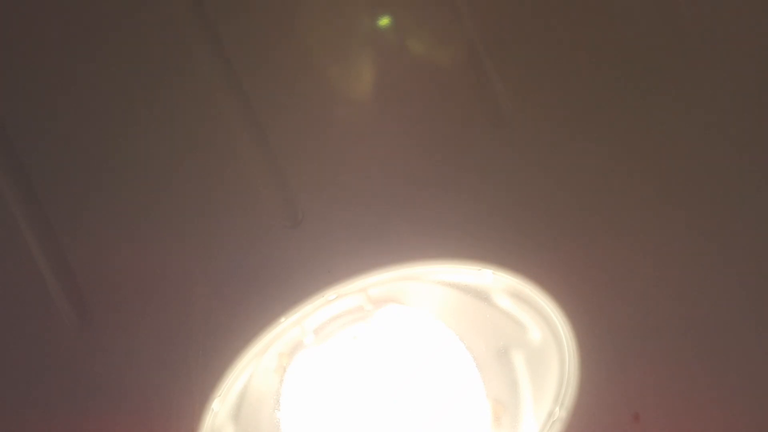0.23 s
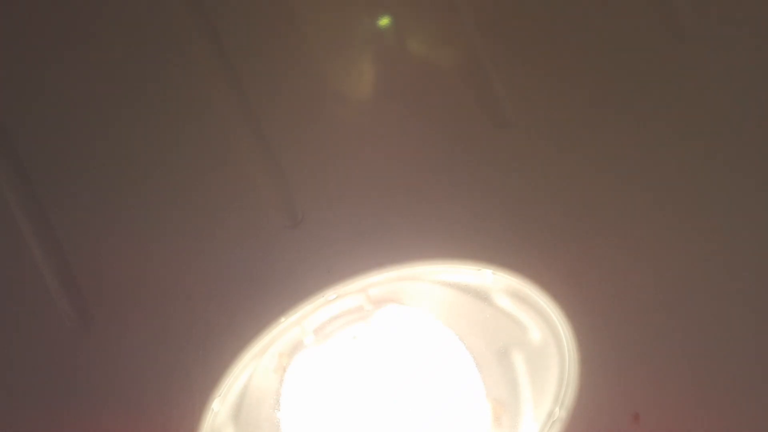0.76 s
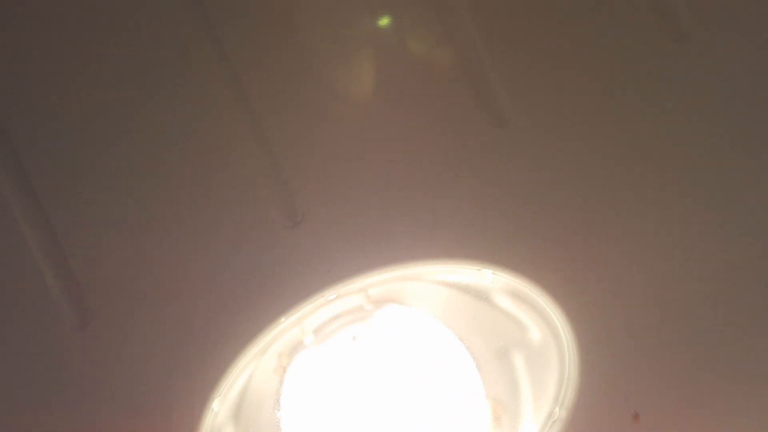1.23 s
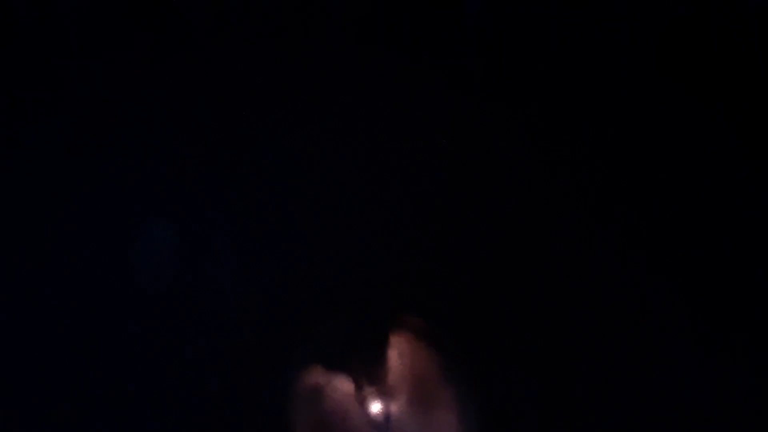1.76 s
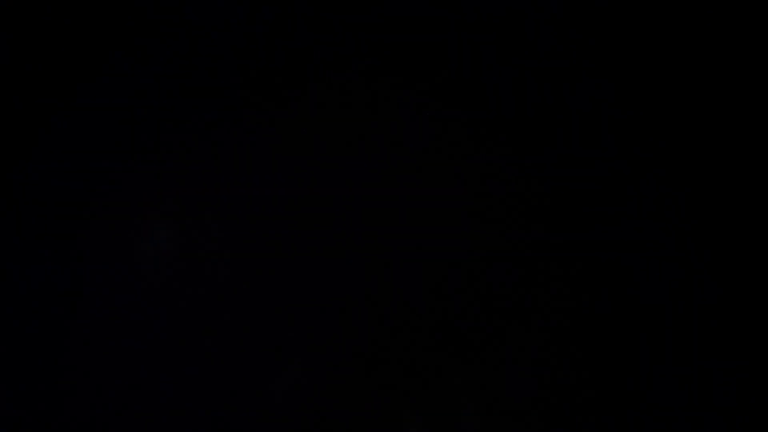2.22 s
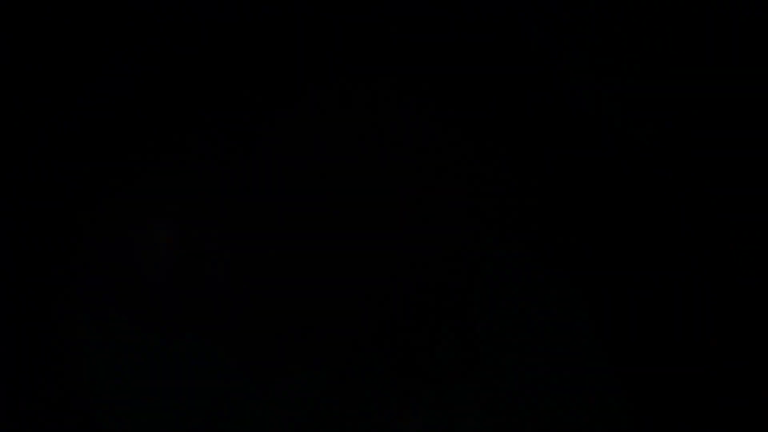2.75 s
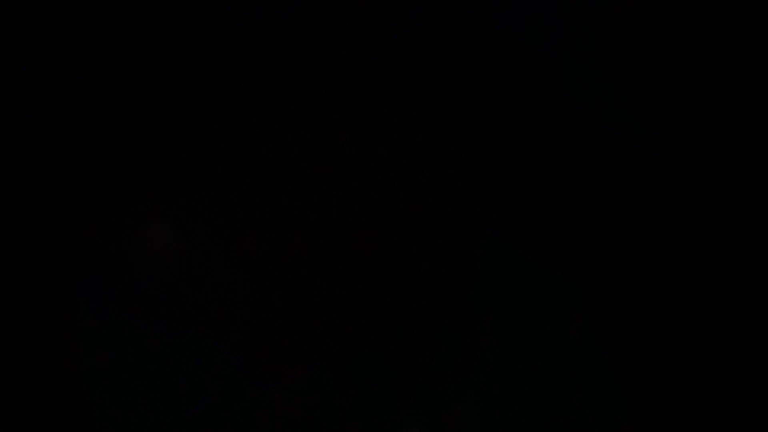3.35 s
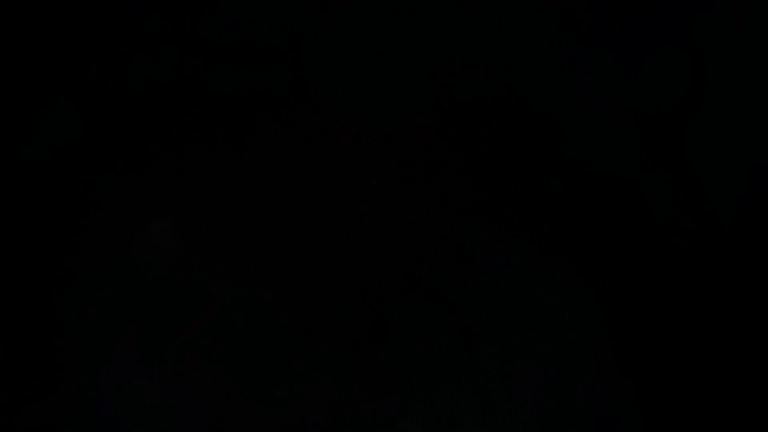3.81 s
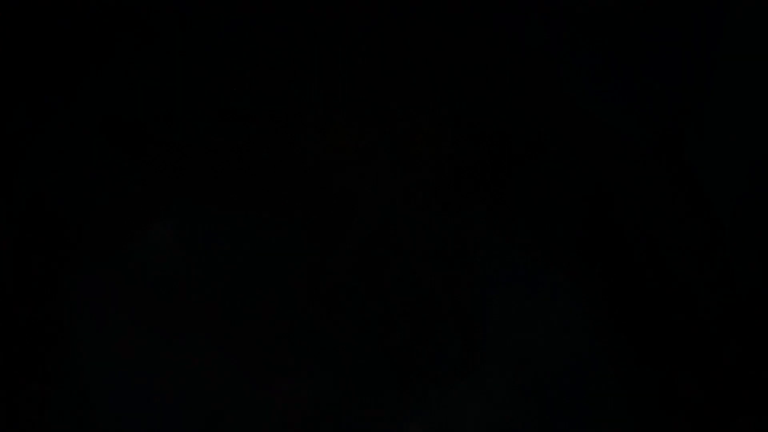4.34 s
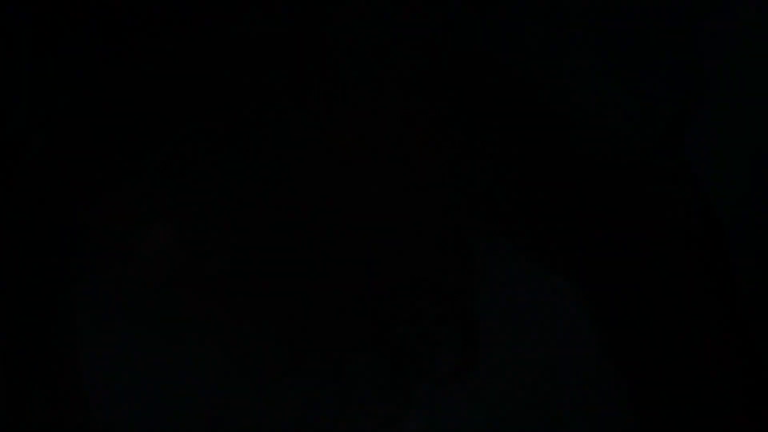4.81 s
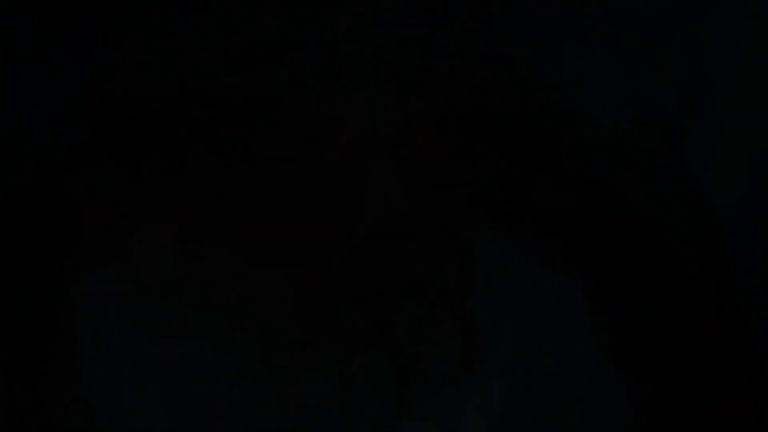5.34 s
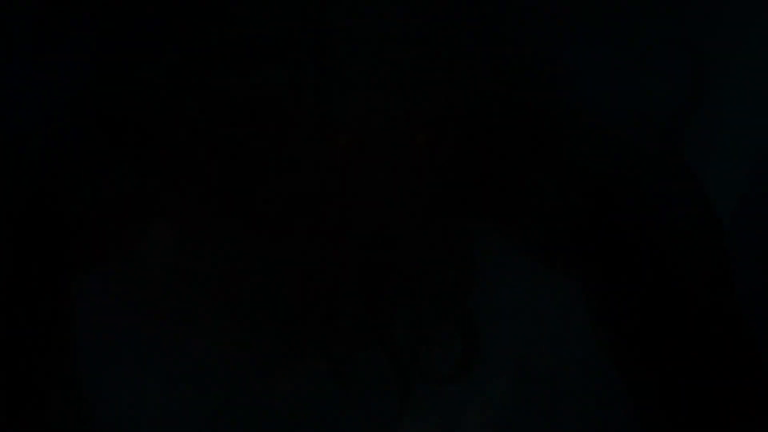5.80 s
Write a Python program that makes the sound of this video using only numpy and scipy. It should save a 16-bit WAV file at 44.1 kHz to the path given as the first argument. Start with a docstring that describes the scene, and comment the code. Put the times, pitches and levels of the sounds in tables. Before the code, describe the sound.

Heard from a shelf inside a refrigerator, the compressor drones low under a faint hiss. The door seal rubs with a few small ticks, then the door lands with a loud thud, its racks clattering and the cabinet ringing briefly. The hiss cuts off and the hum deepens. A circulation fan gradually speeds up to a soft whir, and plastic fittings snap lightly twice.

```python
"""A refrigerator door swings shut, heard from inside: its seal rubs, it lands with a thud,
its racks clatter and the cabinet rings on. Behind it the compressor drones, stirring the air
in the cabinet at its natural pitches (resonances), deeper once the door is shut.
The circulation fan then speeds up, and the plastic fittings tick and snap a few times."""
import sys
import numpy as np
from scipy import signal
from scipy.fft import rfft, irfft, next_fast_len
from scipy.io import wavfile

SR = 44100
rng = np.random.default_rng(int(sys.argv[2]) if len(sys.argv) > 2 else 0)


def unload_audio(sound):
    """Save the sound as a 16-bit wav file, at the path given as the first command line argument."""
    columns = np.transpose(np.atleast_2d(sound))
    # keep every value between -1 and 1, then stretch to whole-number steps
    steps = np.round(np.clip(columns, -1, 1) * 32767)
    wavfile.write(sys.argv[1], SR, steps.astype(np.int16))


N = 268348
T = np.arange(N) / SR
THUD_S = 1.365   # when the door lands
SHORT = SR // 3   # samples in a short burst
SIDES = np.array([[1], [-1]])   # left, right: "mid" is what the ears share, "side" is how they differ


def from_db(db):
    """Turn decibels into a gain."""
    return 10 ** (np.asarray(db) / 20)


def rms_one(x):
    """Scale a sound so that its average strength (rms) is 1."""
    return x / np.sqrt(np.mean(x ** 2) + 1e-20)


def in_time(rows):
    """Join a table's points with straight lines: one curve for each column after the time."""
    times, *columns = np.transpose(rows)
    return [np.interp(T, times, column) for column in columns]


def at_hz(table, hz, column=1):
    """Read one column of a table at any frequency, moving evenly through the octaves."""
    table = np.array(table)
    return np.interp(np.log(hz + 1e-6), np.log(table[:, 0]), table[:, column])


def add(out, start, sound):
    """Mix a short sound in at a given time."""
    i = int(start * SR)
    out[:, i:i + sound.shape[1]] += sound[:, :N - i]


def hump_db(hz, centre_hz, octaves):
    """One peak in the spectrum, falling steeply on both sides."""
    return -24 * np.log10(1 + (np.log2((hz + 1) / centre_hz) / octaves) ** 2)


def box_db(hz):
    """Sound bouncing between the walls and shelves lifts some frequencies."""
    # standing waves of the cabinet: f/Hz, width/Hz, lift/dB
    waves = [(119, 42, 7), (197.4, 20, 9.5), (249.5, 5, 7), (324, 19, 5), (359.8, 4.3, 8), (445, 26, 6.5),
             (524, 26, 5), (585, 34, 7), (740.5, 23, 11), (830, 9.1, 5.5), (838, 59, 4.5), (913, 24, 9.5),
             (1018, 31, 10.5), (1086, 17, 7.5), (1212, 31, 5.5), (1455, 20, 8), (1673, 59, 5.5),
             (1830, 8.7, 5), (2160, 23, 4.5), (2260, 40, 4.5), (2490, 8.7, 6.5), (3180, 17, -1.5),
             (4600, 80, 0), (5050, 33, 7.5)]
    return sum(lift_db / (1 + (2 * (hz - centre) / width) ** 2) for centre, width, lift_db in waves)


def noise(colour_db, size=N):
    """Noise of a given colour inside the cabinet, centred in the bass and wide in the treble; rms 1."""
    # stereo width: f/Hz, side over mid/dB
    spread = [(40, -17), (140, -30), (220, -2), (300, 0.5), (500, -4), (800, -3), (1500, 0), (16000, 0.5)]
    length = next_fast_len(size)
    hz = np.fft.rfftfreq(length, 1 / SR)
    mid, side = np.exp(2j * np.pi * rng.random((2, len(hz))))
    width = from_db(at_hz(spread, hz))
    gain = from_db(colour_db(hz) + box_db(hz)) * (hz > 27) / np.hypot(1, width)
    return rms_one(irfft(gain * (mid + width * side * SIDES), length)[:, :size])


def shaped(spectrum, size=N):
    """Cabinet noise that takes its colour from a table."""
    return noise(lambda hz: at_hz(spectrum, hz), size)


def resonant(centre_hz, width_hz):
    """A resonance stirred at random: a complex tone of rms 1 whose strength and phase wander."""
    slow_rate_hz = 1000
    hz = np.fft.fftfreq(8192, 1 / slow_rate_hz)
    slow = np.fft.ifft(np.exp(2j * np.pi * rng.random(len(hz))) / (1 + (hz / width_hz) ** 2))
    envelope = np.interp(T, np.arange(len(hz)) / slow_rate_hz, slow)
    return envelope / np.sqrt(np.mean(abs(envelope) ** 2)) * np.exp(2j * np.pi * centre_hz * T)


def wobble(rate_hz):
    """A slow random wavering around zero; rms 1."""
    return rms_one(resonant(0, rate_hz).real)


def thin_tones(table):
    """Narrow, rough tones, unrelated at the two ears."""
    return sum(from_db(level_db) * rms_one(np.array([resonant(hz, width_hz).real for ear in range(2)]))
               for hz, width_hz, level_db in table)


def ring(start, hz, t60):
    """One struck tone; t60 is the time it takes to fade by 60 dB."""
    age = np.clip(T - start, 0, 2 * t60)
    return np.sin(2 * np.pi * hz * age) * from_db(-60 * age / t60)


def burst_shape(t60, rise_s, size=SHORT):
    """Echoes build up in the cabinet, then die away."""
    age = T[:size]
    return (1 - np.exp(-age / rise_s)) * from_db(-60 * age / t60)


def burst(centre_hz, octaves, t60, rise_s):
    """One small contact with a single resonance, smeared by the hard walls."""
    return noise(lambda hz: hump_db(hz, centre_hz, octaves), SHORT) * burst_shape(t60, rise_s)


def dense_ringing(table, rise_s, size=SHORT):
    """Noise stands for a crowd of struck tones; each half octave dies at its own rate."""
    spectrum = rfft(shaped(table, size))
    bands = np.round(2 * np.log2(np.fft.rfftfreq(size, 1 / SR) + 20))
    out = np.zeros((2, size))
    for band in np.unique(bands):
        t60 = at_hz(table, 2 ** (band / 2), column=2)
        out += irfft(spectrum * (bands == band), size) * burst_shape(t60, rise_s, size)
    return out


def background():
    """The machine rumbles and hums; shutting the door cuts off the high hiss and its whistles."""
    # compressor rumble with the door open, then shut: f/Hz, relative level/dB
    open_colour = [(30, -26), (75, -6), (180, -5), (265, -5.5), (365, -3.5), (460, -24), (620, -29),
                   (780, -28), (1050, -38.5), (2500, -42.5), (4000, -53.5), (16000, -60.5)]
    shut_colour = [(30, -18), (80, -6.5), (130, -4), (180, 0.5), (270, -7), (365, -3), (470, -21.5),
                   (650, -27), (770, -23), (1150, -41.5), (2200, -42.5), (3500, -49.5), (6500, -62.5),
                   (9000, -50), (16000, -67)]
    # high hiss while the door is open: t/s, level/dB
    hiss_level = [(.04, -62), (.25, -62.5), (.4, -65.5), (.7, -69), (.99, -75), (1.03, -65), (1.36, -62.5),
                  (1.45, -87.5)]
    # its colour: f/Hz, relative level/dB
    hiss_colour = [(1000, -8.5), (2800, -2.5), (3800, -7.5), (5500, -2.5), (7000, -2), (8400, 3),
                   (10000, -4.5), (16000, -8.5)]
    # thin whistles in the hiss: f/Hz, width/Hz, level/dB
    whistles = [(1375, 25, -70.5), (2790, 30, -80), (4915, 18, -71)]
    # how they fade: t/s, gain/dB
    whistle_fade = [(.1, 0), (.36, -5), (.48, -19), (1.3, -28), (1.45, -50.5)]
    # held tones of the machine: f/Hz, level/dB, start/s, end/s
    tones = [(49.6, -52.5, -5, 1.9), (49, -53.5, 3.5, 7), (761, -65, 0.53, 1.5), (772, -63, 1.95, 2.25)]
    tone_fade_s, waver_db = .14, 1.1
    shut = np.clip((T - THUD_S) / 0.15, 0, 1)
    out = (1 - shut) * from_db(-41) * shaped(open_colour) + shut * from_db(-43.5) * shaped(shut_colour)
    out += from_db(in_time(hiss_level)[0]) * shaped(hiss_colour)
    out += from_db(in_time(whistle_fade)[0]) * thin_tones(whistles)
    for hz, level_db, start, end in tones:
        fade = np.clip(np.minimum(T - start, end - T) / tone_fade_s, 0, 1)
        waver = wobble(rate_hz=9.7)
        tone = rms_one(np.sin(2 * np.pi * hz * T + .5 * waver))
        out += from_db(level_db + waver_db * waver) * fade * tone
    return out


def compressor_drone():
    """The compressor stirs the cabinet's air resonances; the deepest two swell together and beat."""
    # air resonances, lowest first: f/Hz, width/Hz, side over mid/dB
    resonances = [(99.8, 4, -29.5), (111.4, 3.4, -28), (141.65, 2.4, -31.5), (218.8, 2.8, -11.5)]
    # the deepest (blooming once the door is shut), middle and highest of them: t/s, level/dB
    deep = [(0.97, -51), (1.54, -23), (1.58, -31), (1.81, -27.5), (1.85, -40.5), (2.25, -26.5), (2.38, -42),
            (2.61, -30), (2.76, -46.5), (3.0, -35), (3.12, -54.5), (3.19, -31.5), (3.46, -39.5),
            (3.49, -50), (3.7, -32), (4.0, -42.5), (4.07, -31.5), (4.27, -37), (4.84, -35), (4.88, -41),
            (5.52, -42.5), (5.68, -29.5), (5.75, -43), (5.94, -28), (5.99, -43), (6.08, -34)]
    middle = [(0.0, -29.5), (0.52, -36.5), (0.66, -27), (0.73, -44), (1.34, -28.5), (1.4, -48), (1.54, -24),
              (1.59, -37.5), (1.88, -33), (1.93, -52.5), (2.22, -38), (2.73, -50), (3.64, -55),
              (3.67, -46.5), (4.54, -42.5), (5.1, -61.5), (5.69, -36.5), (6.08, -38)]
    upper = [(0.0, -37), (0.39, -42), (0.69, -35.5), (0.81, -55), (1.35, -33), (1.42, -43), (3.57, -54),
             (4.1, -43.5), (5.47, -52.5), (5.84, -42.5), (6.08, -48.5)]
    deep_db, middle_db, upper_db = (in_time(curve)[0] for curve in (deep, middle, upper))
    levels_db = (deep_db, deep_db - 10, middle_db, upper_db)
    out = np.zeros((2, N))
    for (hz, width_hz, side_db), level_db in zip(resonances, levels_db):
        swing = resonant(hz, width_hz)
        mid = rms_one(swing.real / np.hypot(abs(swing), .4))   # evens out most of the random swelling
        side = from_db(side_db) * rms_one(resonant(hz, width_hz).real)
        out += from_db(level_db) * (mid + side * SIDES)
    return out


def fan():
    """As the fan speeds up, its blade tones rise in pitch and its rush, duct hiss and whines grow."""
    # the run-up: t/s, speed/(turns per s), lower blade tone/dB, upper blade tone/dB
    run_up = [(1.7, 8, -91.5, -95), (2.5, 31.5, -66, -70), (3.0, 37.8, -54, -60), (3.4, 41.6, -48.5, -53.5),
              (3.8, 43.7, -55.5, -47), (4.2, 44.6, -53, -42.5), (4.7, 45.2, -61, -43.5),
              (5.15, 45.3, -70, -54.5), (6.08, 45.8, -63, -48)]
    # air rushing through the fan: f/Hz, relative level/dB
    air_colour = [(150, -9), (320, 8), (420, -1.5), (560, -1), (660, -15.5), (780, -1), (920, -13),
                  (1300, -8.5), (1700, -27), (2200, -26.5), (3500, -35.5), (5800, -56), (9000, -34),
                  (16000, -33)]
    # thin wavering whines: f/Hz, width/Hz, level at full speed/dB
    whines = [(769, 6.4, -55), (2109, 37, -79), (2730, 58, -81.5), (4630, 25, -78.5), (5000, 28, -77.5)]
    turns_per_s, lower_db, upper_db = in_time(run_up)
    speed = turns_per_s / turns_per_s.max()
    angle = 2 * np.pi * np.cumsum(turns_per_s) / SR
    waver = from_db(wobble(rate_hz=5))
    ear_phase = [[0], [1.3]]
    blades = sum(from_db(level_db) * rms_one(waver * np.sin(cycles_per_turn * angle + ear_phase))
                 for cycles_per_turn, level_db in ((6, lower_db), (7, upper_db)))
    air = from_db(-45) * shaped(air_colour)
    flutter = from_db(1.4 * wobble(rate_hz=9))
    duct = from_db(-71.5) * flutter * noise(lambda hz: hump_db(hz, centre_hz=4670, octaves=0.17))
    return speed ** 6.8 * air + speed ** 4.6 * duct + speed ** 4.2 * thin_tones(whines) + blades


def ticks():
    """Hinge, seal and shelves make small slips as the door shuts and settles."""
    # the slips: t/s, level/dB, f/Hz, width/octaves
    slips = [(0.456, -43, 7000, 6.5), (1.073, -52, 2350, 1.3), (1.136, -45.5, 1850, 0.64),
             (1.191, -46.5, 2400, 1.1), (1.24, -42, 7400, .8), (1.264, -33.5, 4500, 0.75),
             (1.311, -42.5, 3030, 2.8), (1.412, -35, 1080, .25), (1.632, -49.5, 1650, 0.56),
             (1.646, -58.5, 3600, 0.16), (1.678, -50.5, 1560, 0.44), (2.187, -60, 1400, 0.7),
             (2.208, -63, 2230, .12)]
    out = np.zeros((2, N))
    for start, level_db, centre_hz, octaves in slips:
        add(out, start, from_db(level_db) * burst(centre_hz, octaves, t60=.12, rise_s=0.0004))
    return out


def snaps():
    """A plastic fitting slips twice: the cabinet's lining answers, and the second slip leaves a ring."""
    # fittings: t/s, level/dB, snap f/Hz, width/octaves, ring f/Hz, ring gain/dB, lining gain/dB
    fittings = [(3.228, -37, 1890, 0.26, 772, 2.5, 4), (4.819, -39.5, 2240, 0.21, 2430, -1, 6.5)]
    # the lining's answer: f/Hz, relative level/dB, t60/s
    lining_colour = [(100, -4.5, 0.18), (300, -3, 0.24), (520, 1, 0.3), (1000, -11.5, 0.29),
                     (2000, -17.5, 0.25), (3940, -25, 0.14), (4700, -23.5, .11), (5400, -34, 0.21),
                     (9000, -31.5, 0.19), (16000, -39, 0.24)]
    slip_gap_s, overtone_ratio = .0095, 1.92
    out = np.zeros((2, N))
    for start, level_db, snap_hz, octaves, ring_hz, ring_db, lining_db in fittings:
        first, second = (burst(snap_hz, octaves, t60=0.097, rise_s=0.0018) for slip in range(2))
        lining = from_db(lining_db) * dense_ringing(lining_colour, rise_s=0.0065)
        ringing = 0
        for hz, db in ((ring_hz, ring_db), (ring_hz * overtone_ratio, ring_db - 10)):
            t60 = 0.21 * np.sqrt(1000 / hz)   # lower tones last longer
            ringing += from_db(db) * burst(hz, octaves=0.026, t60=t60, rise_s=.001)
        add(out, start, from_db(level_db) * (first + lining))
        add(out, start + slip_gap_s, from_db(level_db) * (from_db(0.5) * second + ringing))
    return out


def racks():
    """Each jolt makes the door racks crack and clatter; the last one leaves them ringing."""
    # jolts as the door stops: t/s, clatter level/dB, crack level/dB, treble cutoff/Hz
    jolts = [(1.365, -24.5, -10.5, 4340), (1.3734, -24, -22, 16000), (1.3764, -20, -13, 11900),
             (1.3797, -21.5, -15.5, 12000)]
    # the racks' clatter: f/Hz, relative level/dB, t60/s
    colour = [(60.6, -5.5, 0.62), (254, -1, 0.2), (477, -5, 0.16), (796, -3, 0.14), (1300, -4, 0.15),
              (2230, -4, 0.093), (3300, -11.5, 0.16), (5500, -9, .115), (8460, -12.5, 0.13),
              (11000, -17.5, 0.095), (16000, -18.5, 0.1)]
    # their clearest tones: f/Hz, relative level/dB, t60/s
    tones = [(560, -17, 0.8), (802, -5, .15), (878, -3, .15), (955, -2, 0.12), (1130, -5, .18),
             (1162, -3, .16), (1245, -4, 0.13), (1320, -4, 0.15), (1457, -6, 0.16), (1646, -5, 0.1),
             (2060, -4.5, .11), (2208, -6, .1), (2400, -8, 0.14), (2690, -12.5, 0.12)]
    out = np.zeros((2, N))
    for start, clatter_db, crack_db, cutoff_hz in jolts:
        crack = from_db(crack_db) * shaped(colour, SHORT) * burst_shape(t60=0.022, rise_s=0.000059)
        clatter = from_db(clatter_db) * dense_ringing(colour, rise_s=0.00052)
        contact = signal.butter(2, cutoff_hz, fs=SR, output="sos")   # a softer contact is duller
        add(out, start, signal.sosfilt(contact, crack + clatter))
    last_jolt_s = jolts[-1][0]
    for hz, level_db, t60 in tones:
        arrivals = last_jolt_s + rng.uniform(0, 0.00093, 2)   # one for each ear
        out += from_db(level_db - 24.5) * np.array([ring(start, hz, t60) for start in arrivals])
    return out


def door():
    """The seal rubs along the frame, the panel lands, the racks clatter and the cabinet rings on."""
    # the seal's rubbing: t/s, level/dB
    rub_level = [(1.0, -81), (1.12, -54), (1.2, -36), (1.25, -41.5), (1.275, -26), (1.3, -32),
                 (1.32, -30.5), (1.36, -24.5), (1.39, -61), (1.42, -100)]
    # its colour: f/Hz, relative level/dB
    rub_colour = [(35, -8), (130, -11.5), (340, 1), (450, -10), (800, -22), (1500, -24.5), (2600, -30.5),
                  (5000, -35), (8500, -37.5), (16000, -44.5)]
    # tones of the panel's thud: f/Hz, level/dB, t60/s, delay at the right ear/s
    panel = [(106, -26, .16, 0.0065), (304, -5.5, 0.028, .001), (640, -12, 0.014, 0.00022),
             (1330, -10.5, 0.013, 0.0017), (1740, -16.5, 0.005, 0.0063)]
    # the cabinet ringing after the blow: f/Hz, relative level/dB, t60/s
    cabinet = [(35, -9, .7), (80, -8, 1), (120, -6, 1), (300, 6.5, 1), (418, -13.5, 1), (900, -17.5, 1),
               (1500, -24, 0.82), (2800, -30, 0.76), (4000, -47.5, .4), (16000, -55.5, .3)]
    rub = from_db(in_time(rub_level)[0]) * shaped(rub_colour)
    blow = racks()
    for hz, level_db, t60, delay in panel:
        blow -= from_db(level_db) * np.array([ring(THUD_S, hz, t60), ring(THUD_S + delay, hz, t60)])
    add(blow, THUD_S, from_db(-27) * dense_ringing(cabinet, rise_s=0.0075, size=SR))
    return rub + blow * from_db(-1 * SIDES)   # the blow leans to the right


def scene():
    """Everything is heard from a shelf, a little stronger on the right."""
    mix = compressor_drone() + background() + fan() + door() + ticks() + snaps()
    return mix * from_db(-1.29 * SIDES)


def record(dry):
    """The microphone dulls the top octave and adds hiss; peaks are rounded and the very top is cut."""
    # microphone response: f/Hz, gain/dB
    microphone = [(25, 1.5), (45, 0.5), (8800, -0.5), (9600, -4.5), (16000, -3.5)]
    length = next_fast_len(N + SR)
    response = from_db(at_hz(microphone, np.fft.rfftfreq(length, 1 / SR)))
    hiss = from_db(-74) * rng.standard_normal((2, N))
    heard = irfft(rfft(dry, length) * response, length)[:, :N] + hiss
    ceiling, fade_s, cutoff_hz = .95, .004, 15750
    rounded = heard / (1 + (heard / ceiling) ** 8) ** (1 / 8)
    soft_ends = np.clip(np.minimum(T, T[-1] - T) / fade_s, 0, 1)
    low_pass = signal.ellip(12, .1, 90, cutoff_hz, fs=SR, output="sos")
    return signal.sosfilt(low_pass, rounded * soft_ends)


dry = scene()
out = record(dry)
unload_audio(out)
```